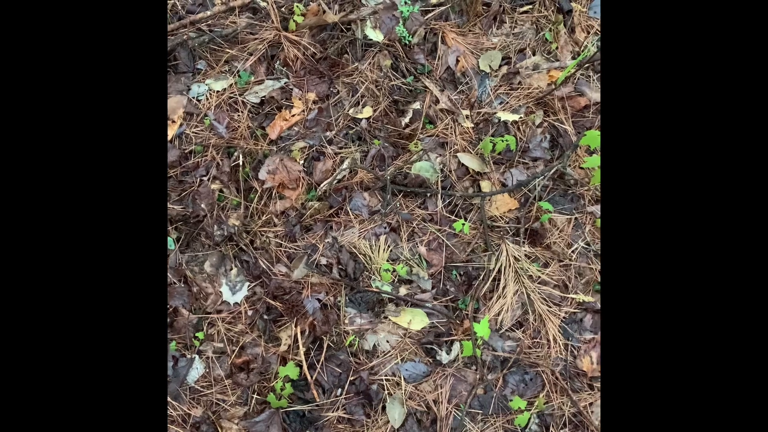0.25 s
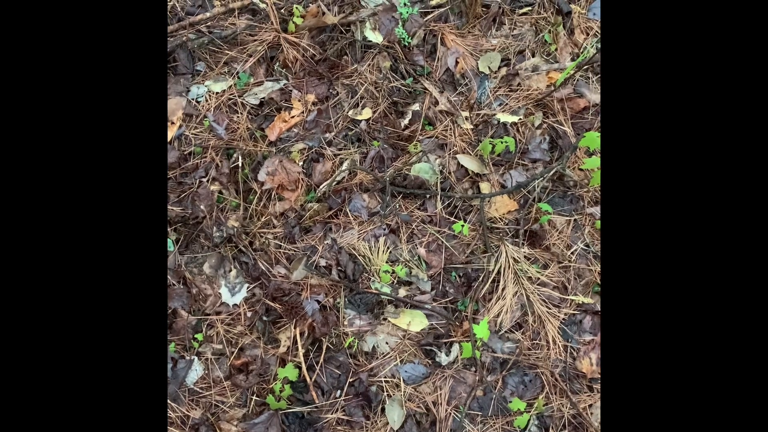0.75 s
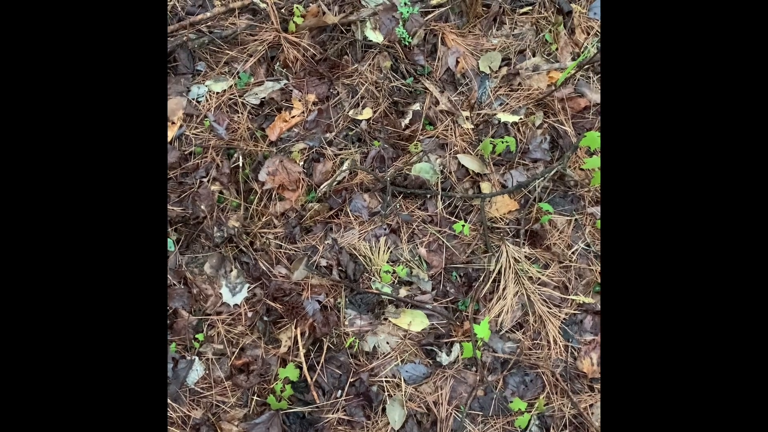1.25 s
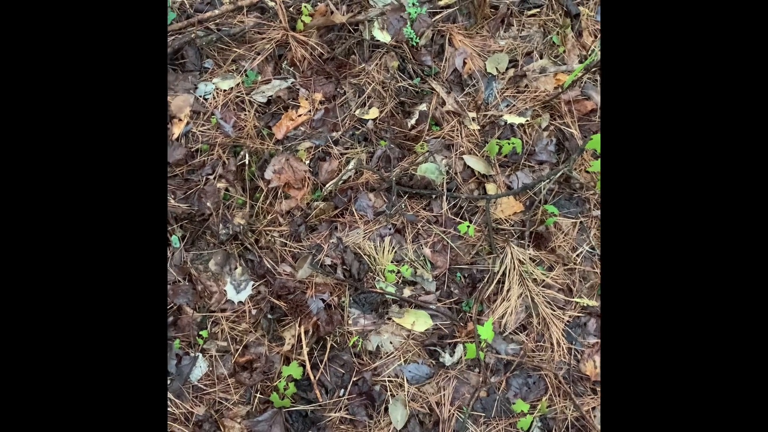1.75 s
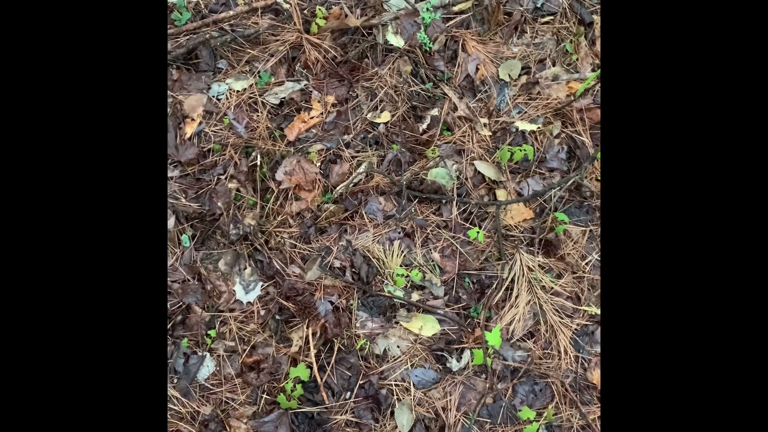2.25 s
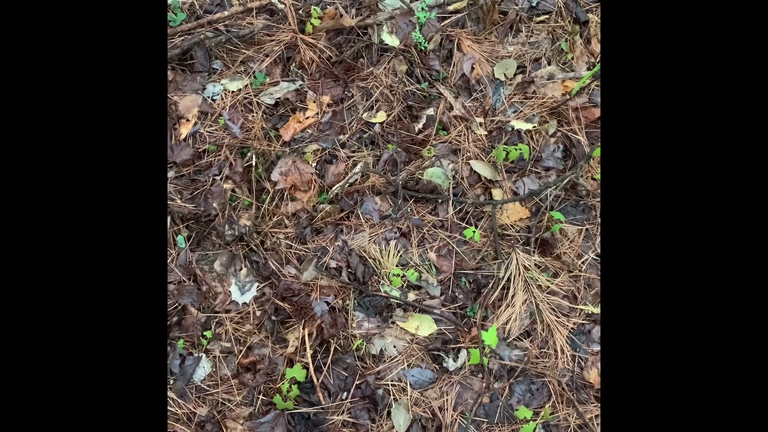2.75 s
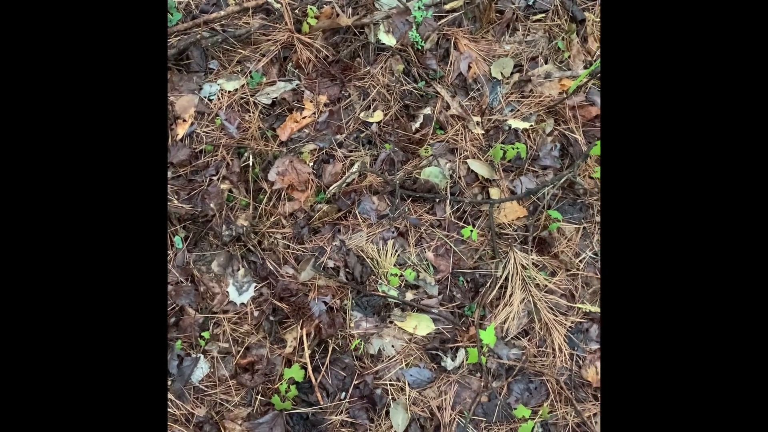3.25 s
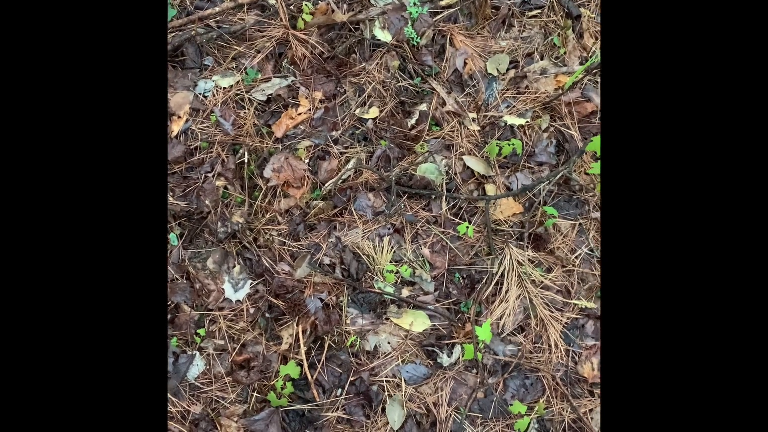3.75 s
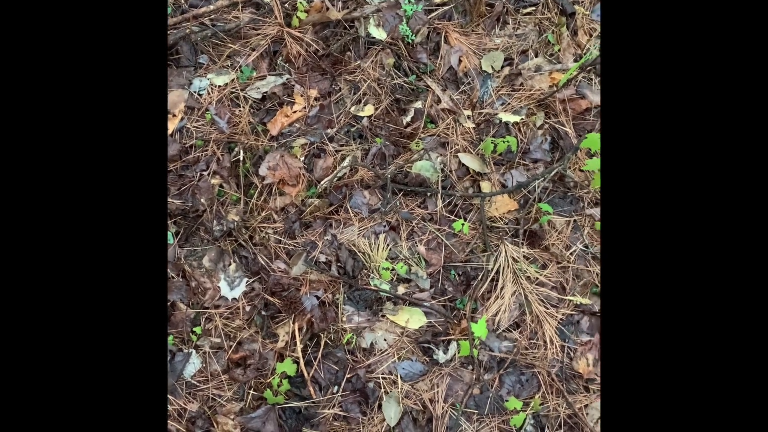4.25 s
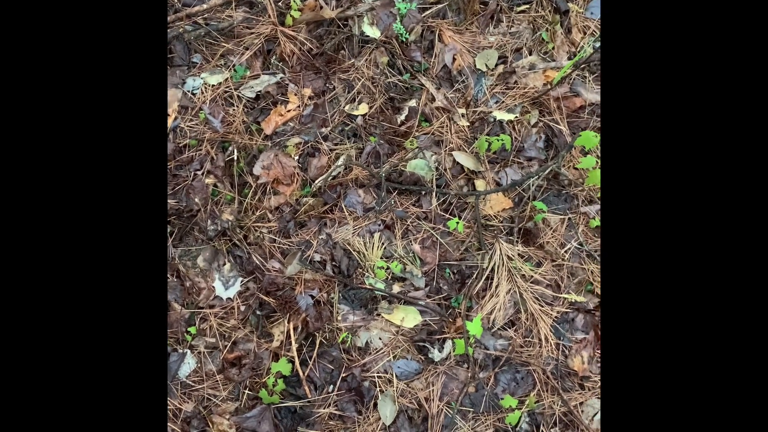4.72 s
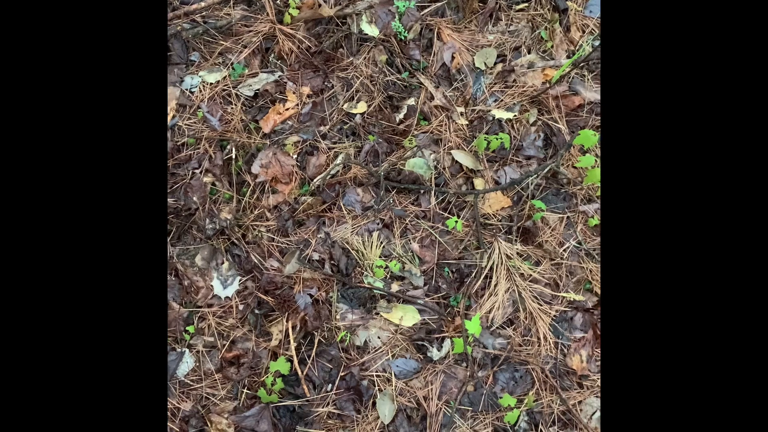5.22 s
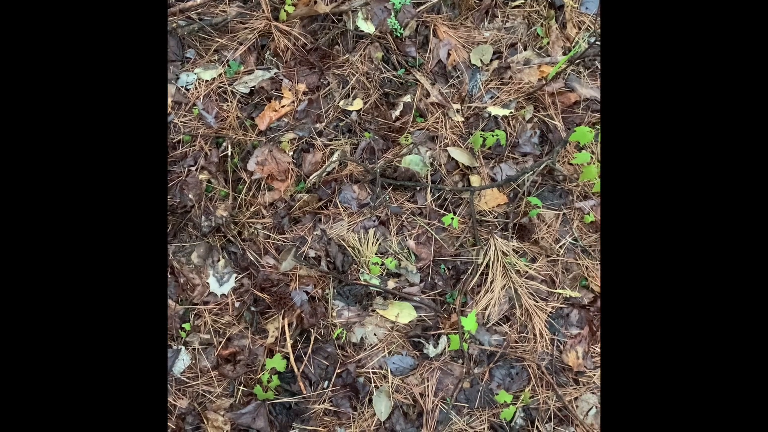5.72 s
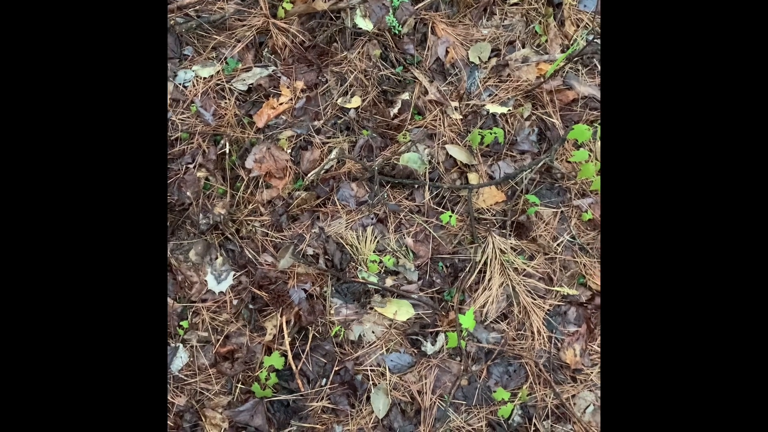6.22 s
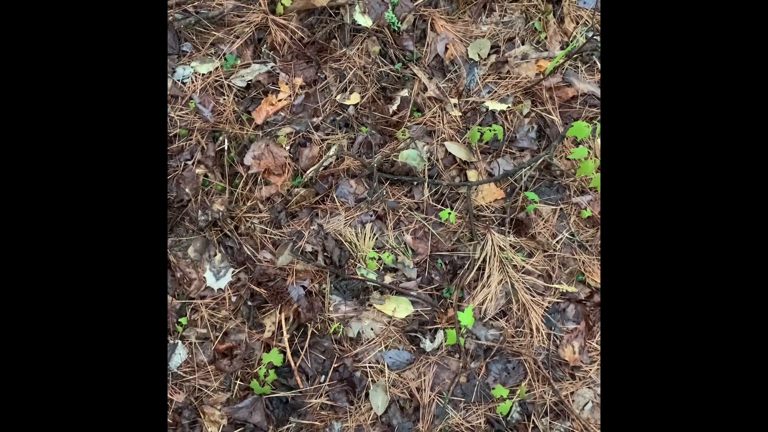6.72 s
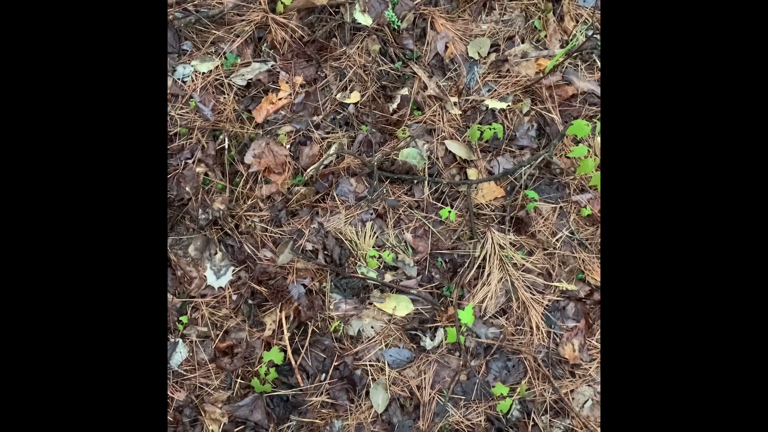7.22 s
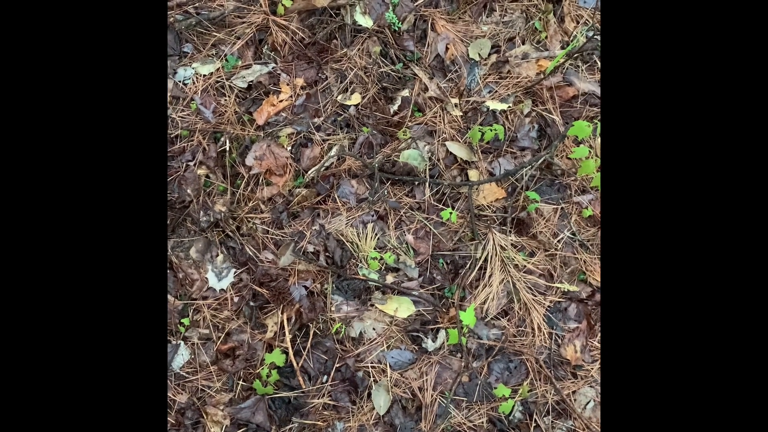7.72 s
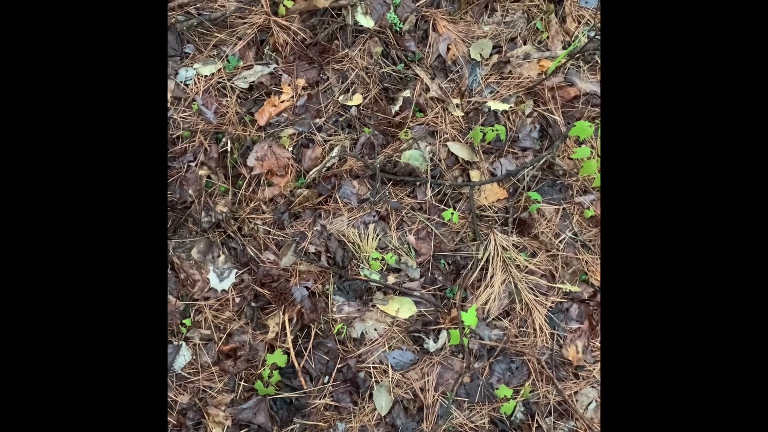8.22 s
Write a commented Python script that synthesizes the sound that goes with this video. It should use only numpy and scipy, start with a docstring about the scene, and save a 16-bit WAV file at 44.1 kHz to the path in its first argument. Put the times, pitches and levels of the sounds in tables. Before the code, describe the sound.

Outdoors over a leafy forest floor, a turkey-like caller close by gives a long run of raspy yelps. Each starts high, sometimes with a tiny squeak, and cracks down to a low rattling note. After six yelps comes a short sharp cluck and a brief pause, then softer yelps resume and continue to the end. Trunks and ground return a faint short echo; the air is very quiet.

```python
"""Turkey yelps in a quiet wood

A run of raspy turkey yelps is heard close by, with one short cluck and a pause early in the run.
In each yelp a membrane starts high and breaks down to a low rattling note: harmonics over filtered slaps
and noise bursts. At times it locks into a near-sine squeak. Ground and trunks echo the calls as delayed
impulses in decaying noise; a small bird (gated tones) and a thin hiss (filtered noise) are faint and far.
"""
import sys
import numpy as np
from scipy import signal
from scipy.fft import rfft, irfft, next_fast_len
from scipy.io import wavfile
from scipy.ndimage import uniform_filter1d

SR = 44100
rng = np.random.default_rng(int(sys.argv[2]) if len(sys.argv) > 2 else 0)


def to_wav(s):
    """Save 16-bit WAV."""
    ch = np.atleast_2d(s).T  # columns
    pcm = np.round(np.clip(ch, -1, 1) * 32767)  # PCM
    wavfile.write(sys.argv[1], SR, pcm.astype(np.int16))


N = 373527
TIME = np.arange(N) / SR  # t/s

# Spectra are relative: the level of each filtered sound is set where it is used.
# still air of the wood: f/Hz, level/dB
AIR_SPECTRUM = [(20, -28.5), (45, 3.5), (65, 4), (120, -2), (300, -7), (1000, -16), (3000, -19.5),
                (7000, -25.5), (12000, -20), (15500, -14)]
# thin far hiss: f/Hz, level/dB
HISS_SPECTRUM = [(3500, -49), (5200, 1.5), (6100, 12), (7200, 7), (9000, -37)]
# course of the far hiss: t/s, level/dB
HISS_COURSE = [(0, -110), (3.9, -93), (4.5, -89.5), (5.1, -81.5), (5.45, -83), (5.9, -89.5), (8.47, -110)]
# notes of the far songbird: t/s, f/Hz, level/dB
BIRD_NOTES = [(5.52, 4900, -89), (5.60, 4500, -88), (5.86, 4300, -87), (5.95, 4300, -87)]
# single echoes from ground and trunks: delay t/s, level/dB
TRUNK_ECHOES = [(.006, -20), (.019, -19), (.031, -20), (.052, -22.5), (.078, -28), (.125, -33), (.19, -37),
                (.268, -39)]
# diffuse response of the wood: f/Hz, level/dB
WOOD_RESPONSE = [(200, 8), (500, -29), (650, 11.5), (900, -4.5), (1300, 5), (1700, 3.5), (2000, -4),
                 (2400, -2), (3000, -5), (6000, -8), (15000, 5)]
# level difference of the two microphone ports: f/Hz, left over right level/dB
PORT_LEVEL = [(400, -1), (800, 0), (1250, 3), (2000, 2), (3200, 2), (4200, 0), (15000, 0)]
# the left port hears the sound earlier: f/Hz, lead t/s
PORT_ADVANCE = [(600, .00042), (950, .00045), (1300, .00034), (1800, .00033), (2400, .00026), (2900, .0004),
                (4700, .000318), (9200, .000272), (15000, .000265)]
# hiss of a wide open membrane: f/Hz, level/dB
SPIT_SPECTRUM = [(2000, -27), (2500, 2.5), (2800, 7), (3250, 14), (3420, 11.5), (3650, 15.5), (3880, 14),
                 (4120, 20.5), (4400, -26), (4800, -36)]
# fine spray above that hiss: f/Hz, level/dB
SPRAY_SPECTRUM = [(4500, -50), (6000, -22.5), (7400, 2.5), (8800, 5.5), (9600, 1), (10700, 5.5),
                  (12500, -12.5), (15000, -15.5)]
# course of the spray through the run: t/s, level/dB
SPRAY_COURSE = [(0.1, -39), (1.25, -30.5), (2.0, -33.5), (3.0, -42), (4.2, -37.5), (5.3, -40), (6.7, -43),
                (7.5, -40), (8.4, -42)]
# low rattle of a wide open membrane: f/Hz, level/dB
RATTLE_SPECTRUM = [(150, -71), (280, -44.5), (380, -5), (450, -12.5), (510, 0), (580, -15.5), (720, 9),
                   (850, 15.5), (1000, -25), (1400, -84)]
# resonances of the throat's core: f/Hz, level/dB
CORE_RESONANCE = [(700, -55), (950, 1.5), (1120, 12), (1400, 8), (1800, -38), (2200, -46), (2550, -46)]
# resonances of the sharp edge of a tight membrane: f/Hz, level/dB
EDGE_RESONANCE = [(900, -59.5), (1250, -22.5), (1550, 15), (1780, 7.5), (1960, -11.5), (2200, 0.5),
                  (2400, -15.5), (2600, -53)]
# gain of the throat for the clear harmonics: f/Hz, level/dB
THROAT_GAIN = [(300, -26.5), (520, -47.5), (650, -19.5), (760, -3.5), (900, -11), (1150, 4.5), (1330, 1),
               (1650, -6), (2000, -30), (2300, -16), (2600, -68.5)]
# modes of the membrane: f/Hz, level/dB, share of the sharp edge's level that they follow [0-1]
MEMBRANE_MODES = [(1130, -11, 0), (1530, -1.5, .8), (1760, -5.5, 1), (1950, -4.5, 1)]
# squeaks: start t/s, end t/s, first f/Hz, last f/Hz, share of the sound [0-1]
SQUEAK_EVENTS = [(0.203, 0.229, 1225, 1270, 0.5), (0.581, 0.619, 1195, 1401, 0.58),
                 (0.845, 0.87, 1189, 1210, 0.58), (0.935, 0.955, 1257, 1362, 0.4),
                 (1.247, 1.313, 1197, 1399, 0.66), (1.592, 1.677, 1170, 1330, 0.49),
                 (2.002, 2.043, 1184, 1377, 0.55), (2.477, 2.509, 1172, 1274, 0.73),
                 (3.823, 3.857, 1192, 1232, 0.86), (4.213, 4.314, 1123, 1270, 0.99),
                 (4.564, 4.586, 1198, 1089, 0.91), (4.655, 4.665, 1172, 1222, 0.82),
                 (5.042, 5.076, 1147, 1320, 0.91), (5.317, 5.337, 1211, 1110, 0.98),
                 (5.417, 5.439, 1181, 1240, 1), (5.668, 5.687, 1197, 1102, 0.96),
                 (5.762, 5.784, 1157, 1264, 0.79), (6.001, 6.028, 1131, 1189, 0.83),
                 (6.103, 6.119, 1217, 1250, 0.92), (6.441, 6.468, 1185, 1263, 0.89),
                 (6.794, 6.816, 1206, 1174, 0.88), (7.481, 7.491, 1199, 1149, 0.99),
                 (7.507, 7.584, 1186, 1240, 0.67), (7.92, 7.995, 1199, 1154, 0.79)]
# yelps: start t/s, length t/s, fall to the low note t/s, low f/Hz, level/dB, swell over the yelp level/dB,
# clear tone relative level/dB, sharp edge relative level/dB
YELP_EVENTS = [(0.099, .15, .055, 662, -23.5, 4, -8.5, 0), (.455, .19, 0.082, 728, -25.5, -3, -7, -1),
               (.797, 0.18, 0.071, 656.4, -25, -4, -3, 0),
               (1.181, 0.16, 0.059, 738, -25.5, -11.5, -10.5, -2),
               (1.542, 0.16, 0.058, 736, -26, -0.5, 0, -3), (1.913, .15, .04, 668.6, -26, 0.5, -6, -2),
               (2.453, 0.058, 0.022, 765, -21.5, 3.5, -10.5, -4),
               (2.982, 0.1, .035, 652, -31.5, -11, -2, -7), (3.33, 0.16, 0.046, 650, -30.5, -5.5, -4, -6),
               (3.713, 0.16, 0.059, 657.2, -27.5, 7, -1, -5), (4.182, 0.14, 0.053, 790, -25, 9, -25.5, -8),
               (4.553, 0.13, 0.04, 656.2, -28.5, -6, -2.5, -7),
               (4.948, 0.15, 0.05, 673.7, -27.5, 2.5, 4, -7),
               (5.286, 0.19, 0.064, 675.7, -28, -1.5, 4, -7.5),
               (5.648, .157, .052, 671.3, -29, 1, -4.5, -7),
               (5.976, 0.18, 0.058, 663.1, -27.5, -9.5, -0.5, -8),
               (6.318, 0.18, 0.048, 702.7, -27.5, 2, -3.5, -7.5),
               (6.664, 0.18, 0.05, 654.3, -28.5, -2.5, 2, -6.5),
               (7.037, 0.17, 0.062, 654.4, -27.5, -2.5, -2, -5.5),
               (7.455, 0.14, .043, 731.8, -25, -1.5, -11.5, -7),
               (7.882, .16, 0.048, 717.3, -27.5, -2, -3, -6.5),
               (8.378, .085, 0.013, 658.3, -27, -0.5, 3.5, -4)]

# a yelp swells in (more slowly when its pitch falls slowly), holds, and closes
ATTACK_S, ATTACK_PER_FALL, ATTACK_DEPTH_DB, ATTACK_CURVE = 0.033, 0.26, 25.5, 2.62
RELEASE_S, RELEASE_DEPTH_DB, RELEASE_CURVE = 0.046, 16, 1.45
SHAKE_DB, SHAKES_PER_S = .7, 70  # unsteady air pressure
SQUEAK_GAIN_DB = 2.8  # a locked membrane swings wider
LEAVE_SHARE = .69  # part of the yelp after which the low note lifts again
SWING_LIMIT_DB = -20.5  # level about which the widest swings are reined in
LOWEST_HZ = 257  # the small throat radiates little below this
CUTOFF_HZ = 15800


def from_db(db):
    """Decibel definition: amplitude ratio from a level."""
    return 10 ** (np.asarray(db) / 20)


def rms_one(x):
    """Normalisation: divide by the root mean square."""
    return x / np.sqrt(np.mean(x ** 2) + 1e-20)


def at_hz(points, hz):
    """Interpolation: read a table on a log-frequency axis."""
    f, value = np.transpose(points)
    return np.interp(np.log(np.maximum(hz, 1)), np.log(f), value)


def colour(x, spectrum):
    """Linear filtering: multiply the Fourier transform by the gain of an (f/Hz, level/dB) table."""
    size = next_fast_len(x.shape[-1] + 4096)
    hz = np.arange(size // 2 + 1) * SR / size
    gain = from_db(at_hz(spectrum, hz))
    return irfft(rfft(x, size) * gain, size)[..., :x.shape[-1]]


def drift(rate):
    """Random modulation: a wander through about `rate` random values a second; rms 1."""
    knots = rng.standard_normal(int(N / SR * rate) + 2)
    return rms_one(np.interp(TIME * rate, np.arange(len(knots)), knots))


def gate(start, end, ramp):
    """Amplitude envelope: 1 between two times, with linear flanks."""
    return np.clip(np.minimum(TIME - start, end - TIME) / ramp + .5, 0, 1)


def still_air(apart):
    """Ambient noise: a part common to both channels and a part independent in each; rms 1."""
    noise = rng.standard_normal(N) + apart * rng.standard_normal((2, N))
    return rms_one(colour(noise, AIR_SPECTRUM))


def far_hiss():
    """Band-limited noise: a thin hiss that swells and flickers."""
    level_db = np.interp(TIME, *np.transpose(HISS_COURSE)) + 2.6 * drift(40)
    return rms_one(colour(rng.standard_normal(N), HISS_SPECTRUM)) * from_db(level_db)


def songbird():
    """Frequency modulation: short tones blurred by distance, their pitch shaken at random."""
    blurred_time = np.cumsum(1 + .04 * drift(600)) / SR
    return sum(from_db(db) * gate(start, start + 0.026, .02) * np.sin(2 * np.pi * hz * blurred_time)
               for start, hz, db in BIRD_NOTES)


def background(air_db, apart):
    """Superposition: still air, thin hiss and far chirps add."""
    return from_db(air_db) * still_air(apart) + far_hiss() + songbird()


def dying_echo(level_db, t60):
    """Exponential decay: an earlier yelp still fades among the trees, as noise of the call's colour."""
    noise = rng.standard_normal((2, SR))
    tail = rms_one(colour(noise, CORE_RESONANCE)) + rms_one(colour(noise, EDGE_RESONANCE))
    tail = tail + 0.33 * rms_one(colour(noise, RATTLE_SPECTRUM))
    decay = from_db(level_db - 60 * TIME[:SR] / t60)
    return np.pad(colour(tail, WOOD_RESPONSE) * decay, ((0, 0), (0, N - SR)))


def wood(x, near_db, near_t60, far_db, far_t60, far_cut_hz, clump_db):
    """Scattering: convolution with brush noise, single trunk echoes and a long, dull, lumpy tail."""
    t = TIME[:SR]
    build_up = np.clip(t / .015, 0, 1)
    near = rng.standard_normal((2, SR)) * from_db(near_db - 60 * t / near_t60) * build_up
    far_level_db = far_db - 60 * t / far_t60 + clump_db * drift(45)[:SR]
    far = rng.standard_normal((2, SR)) * from_db(far_level_db) * build_up
    for delay, db in TRUNK_ECHOES:
        path = far if delay > .1 else near  # late echoes are dulled with the far tail
        arrival = delay + rng.uniform(0, .0006, 2)  # one for each channel
        path[[0, 1], (arrival * SR).astype(int)] += from_db(db)
    far = signal.sosfilt(signal.butter(4, far_cut_hz, fs=SR, output="sos"), far)
    return signal.fftconvolve(x[None], colour(near + far, WOOD_RESPONSE), axes=1)[:, :N]


def ports(x):
    """Interaural differences: a caller to one side differs in level and arrival at two microphone ports."""
    size = next_fast_len(N + 4096)
    hz = np.arange(size // 2 + 1) * SR / size
    tilt = from_db(at_hz(PORT_LEVEL, hz) / 2)
    advance = np.exp(2j * np.pi * hz * at_hz(PORT_ADVANCE, hz))
    return irfft(rfft(x, size) * [tilt * advance, 1 / tilt], size)[:, :N]


def radiate(x):
    """Saturation and radiation: the widest swings are reined in smoothly and the bass is lost."""
    power = np.abs(uniform_filter1d(x ** 2, int(.004 * SR)))
    limited = x / (1 + (power / from_db(SWING_LIMIT_DB) ** 2) ** 2) ** .25
    return signal.sosfilt(signal.butter(2, LOWEST_HZ, "high", fs=SR, output="sos"), limited)


def flutter(swing, spectrum, spread_db):
    """Modulated turbulence: air torn off by the membrane, in bursts on its widest swings; rms 1."""
    bursts = np.abs(swing) ** 1.1 * from_db(spread_db * drift(160))
    return rms_one(colour(bursts * rng.standard_normal(N), spectrum))


def ribbed(x, spacing_hz, depth):
    """Comb filtering: one short reflection ribs the hiss with evenly spaced bands."""
    reflection = np.interp(TIME - 1 / spacing_hz, TIME, x)
    return (x + depth * reflection) / np.hypot(1, depth)


def even(x, span):
    """Bounded amplitude: the membrane's swing keeps a steady level over a short span."""
    power = np.abs(uniform_filter1d(x ** 2, max(int(span * SR), 8)))
    return x / np.sqrt(power + 1e-6)


def loudness(share):
    """Amplitude envelope: attack, a shaky hold that swells or fades, release; squeaks stand out."""
    gain = np.zeros(N)
    for start, length, fall, _, level_db, swell_db, _, _ in YELP_EVENTS:
        near = np.abs(TIME - start - length / 2) < length
        t = TIME[near] - start
        rising = np.maximum(1 - t / (ATTACK_S + ATTACK_PER_FALL * fall), 0) ** ATTACK_CURVE
        closing = np.maximum(1 - (length - t) / RELEASE_S, 0) ** RELEASE_CURVE
        held_db = level_db + swell_db * (t / length - .5)
        gain[near] += from_db(held_db - ATTACK_DEPTH_DB * rising - RELEASE_DEPTH_DB * closing)
    return gain * from_db(SQUEAK_GAIN_DB * share + SHAKE_DB * drift(SHAKES_PER_S))


def gesture(high_hz, hz_per_edge_db, release_hz, sag, release_tone_db, onset_tone_db, glide_tone_db):
    """Tension and pitch: it falls as the membrane opens (from higher if tight), sags, lifts as it closes."""
    rows = []  # t/s, f/Hz, clear tone level/dB, sharp edge level/dB, opening
    for start, length, fall, hz, _, _, tone_db, edge_db in YELP_EVENTS:
        low, leave, end = start + fall, start + LEAVE_SHARE * length, start + length
        top = high_hz + hz_per_edge_db * edge_db
        rows += [(start, top, onset_tone_db + edge_db, edge_db, .05),
                 (start + .6 * fall, .62 * hz + .38 * top, glide_tone_db, edge_db, .45),
                 (low, hz * (1 + sag), tone_db, edge_db, 1),
                 ((low + leave) / 2, hz * (1 - sag), tone_db, edge_db, 1),
                 (leave, hz * (1 + sag), tone_db, edge_db, 1),
                 (leave + .3 * (end - leave), hz * 1.07, release_tone_db, edge_db, .8),
                 (end, release_hz, release_tone_db, edge_db, .4)]
    times, *columns = np.transpose(rows)
    return [np.interp(TIME, np.sort(times), column) for column in columns]


def partial(number, pitch, cycles, spread_db, rate):
    """Source and filter: one partial with the throat's gain at its frequency, wavering in level."""
    level_db = at_hz(THROAT_GAIN, number * pitch) + spread_db * drift(rate)
    return from_db(level_db) * np.sin(2 * np.pi * number * cycles)


def membrane_modes(edge_db, beat_db):
    """Modal vibration: the membrane's own modes flare up at random and beat against each other."""
    modes = np.zeros(N)
    for hz, db, follow in MEMBRANE_MODES:
        phase = 2 * np.pi * np.cumsum(hz * (1 + 0.027 * drift(80))) / SR
        modes += from_db(db + follow * edge_db + beat_db * drift(90)) * np.sin(phase)
    return modes


def slap_rasp(pitch, edge_db, slap_db, air_share):
    """Impulsive excitation: uneven slaps, one to a cycle, and noise ring the core and the sharp edge."""
    closing = np.diff(np.floor(np.cumsum(pitch * (1 + 0.14 * drift(700))) / SR), prepend=0)
    slaps = rms_one(closing * from_db(slap_db * drift(450))) + air_share * rng.standard_normal(N)
    core = from_db(1) * rms_one(colour(slaps, CORE_RESONANCE))
    edge = from_db(edge_db - 1.3) * rms_one(colour(slaps, EDGE_RESONANCE))
    return core + edge


def membrane(pitch, tone_db, edge_db, jitter, slap_db, air_share, half_db, wander, beat_db):
    """Self-sustained oscillation: harmonics and half-harmonics over modes and the rasp of slaps."""
    cycles = np.cumsum(pitch * (1 + jitter * drift(500))) / SR
    tone = sum(partial(k, pitch, cycles, 2.08, 110) for k in range(1, 4))
    # strong and weak cycles alternate unsteadily, which puts wavering lines between the harmonics
    slipped = cycles + np.cumsum(wander * pitch * drift(70)) / SR
    halves = sum(partial(k + .5, pitch, slipped, 2.5, 70) for k in range(3))
    rasp = slap_rasp(pitch, edge_db, slap_db, air_share)
    modes = membrane_modes(edge_db, beat_db)
    clear = from_db(tone_db + 5.5) * tone
    return even(.8 * rasp + modes + clear + from_db(half_db + edge_db / 2) * halves, span=.012)


def squeaks(waver, second_db):
    """Mode locking: the membrane holds a near sine that bends late. Returns the tone and its share."""
    pitch, share = np.full(N, 1200.), np.zeros(N)
    for start, end, first_hz, last_hz, part in SQUEAK_EVENTS:
        near = slice(int((start - .006) * SR), int((end + .006) * SR))
        along = np.clip((TIME[near] - start) / (end - start), 0, 1)
        pitch[near] = first_hz + (last_hz - first_hz) * along ** 2.6
        flank = np.minimum(TIME[near] - start, end - TIME[near]) / .006 + .5
        share[near] = np.clip(part, 0, .998) * np.clip(flank, 0, 1)
    phase = 2 * np.pi * np.cumsum(pitch * (1 + waver * drift(300))) / SR
    return np.sqrt(2) * (np.sin(phase) + from_db(second_db) * np.sin(2 * phase)), share


def caller():
    """Competing regimes: rasp and squeak trade places under the loudness of each yelp."""
    pitch, tone_db, edge_db, opening = gesture(
        high_hz=1259.7, hz_per_edge_db=40, release_hz=845.2, sag=.008,
        release_tone_db=-19, onset_tone_db=6.5, glide_tone_db=-3.5)
    rasp = membrane(pitch, tone_db, edge_db, jitter=.01, slap_db=4.5, air_share=.35,
                    half_db=-4, wander=.02, beat_db=4.5)
    squeak, share = squeaks(waver=.007, second_db=-30)
    swing = even((1 - share) ** .6 * rasp + np.sqrt(share) * squeak, span=.008)

    rattle_gain = from_db(-15.5 + 0.054 * edge_db) * opening ** 2 * np.sqrt(1 - share)
    rattle = rattle_gain * flutter(swing, RATTLE_SPECTRUM, spread_db=3.0)
    spit = from_db(-22.5 + 0.22 * edge_db) * flutter(swing, SPIT_SPECTRUM, spread_db=2.0)
    spray_gain = from_db(np.interp(TIME, *np.transpose(SPRAY_COURSE)))
    spray = spray_gain * flutter(swing, SPRAY_SPECTRUM, spread_db=2.85)
    hiss = ribbed(spit + spray, spacing_hz=282, depth=.6)
    airflow = opening ** 0.64 * np.sqrt(1 - 0.8 * share)
    return loudness(share) * (swing + rattle + airflow * hiss)


def scene():
    """Superposition: the caller, direct and through the wood, over the quiet background."""
    voice = radiate(caller())
    direct = from_db(-2.0) * ports(voice)
    echoes = wood(voice, near_db=-49, near_t60=.25, far_db=-62, far_t60=1.05,
                  far_cut_hz=2000, clump_db=3.5)
    fading = dying_echo(level_db=-54.5, t60=0.48)
    return direct + echoes + fading + background(air_db=-77.5, apart=1.0)


def record(dry):
    """Band limitation: a steep elliptic low-pass cuts the top."""
    return signal.sosfilt(signal.ellip(10, .2, 80, CUTOFF_HZ, fs=SR, output="sos"), dry)


dry = scene()
out = record(dry)
to_wav(out)
```